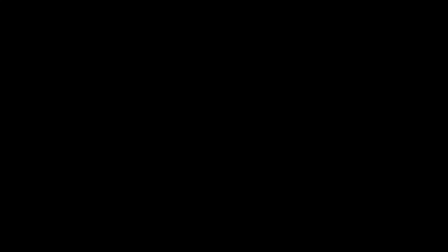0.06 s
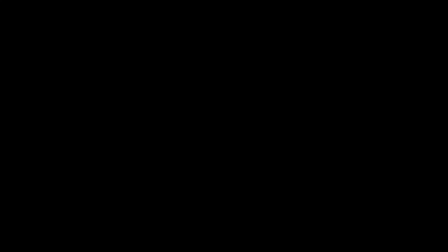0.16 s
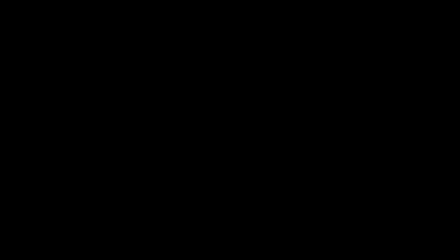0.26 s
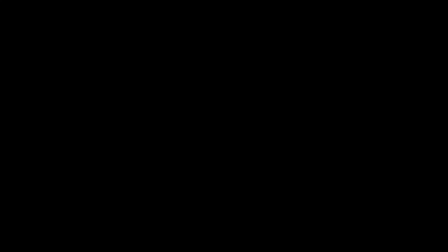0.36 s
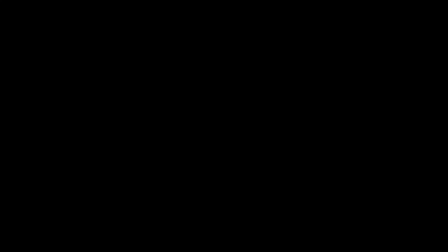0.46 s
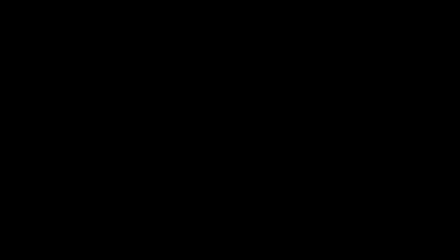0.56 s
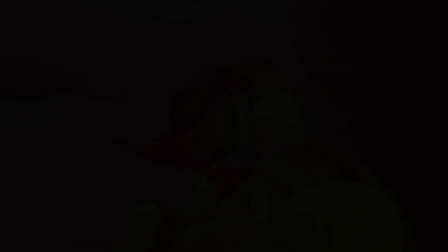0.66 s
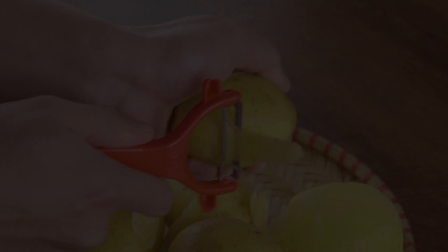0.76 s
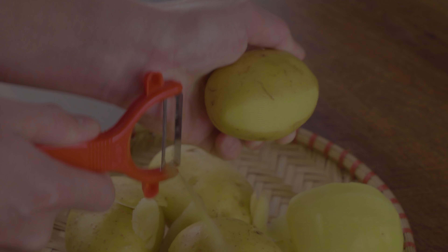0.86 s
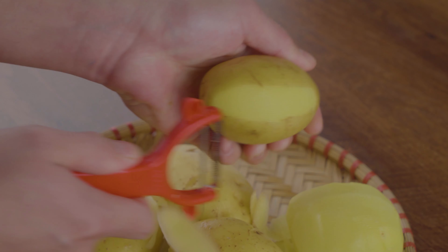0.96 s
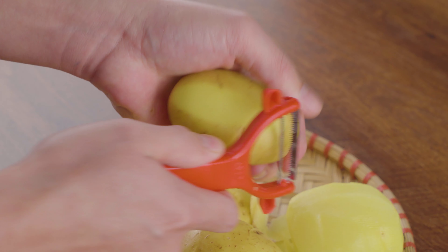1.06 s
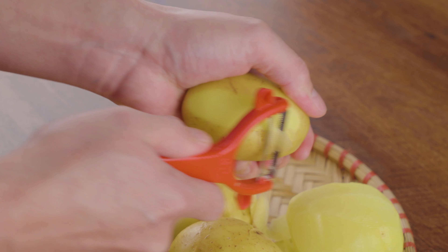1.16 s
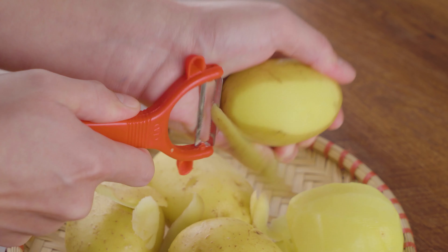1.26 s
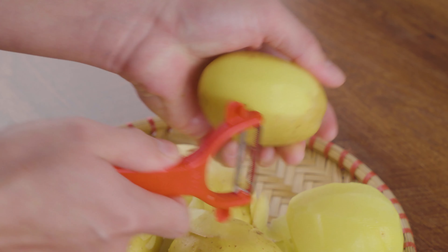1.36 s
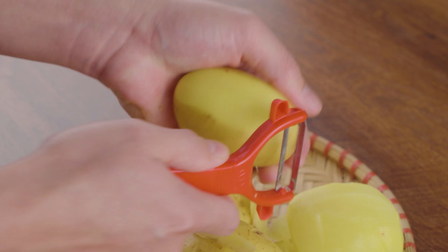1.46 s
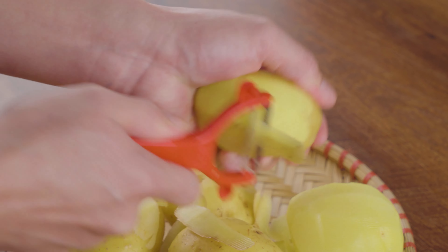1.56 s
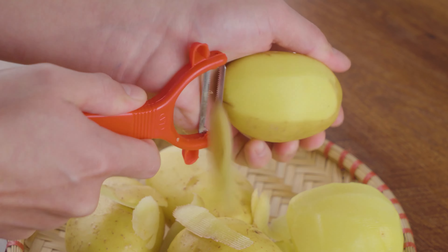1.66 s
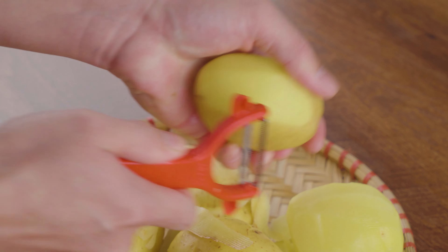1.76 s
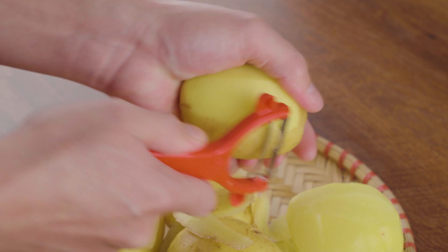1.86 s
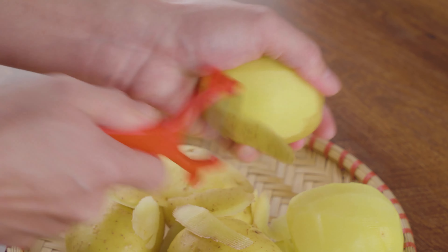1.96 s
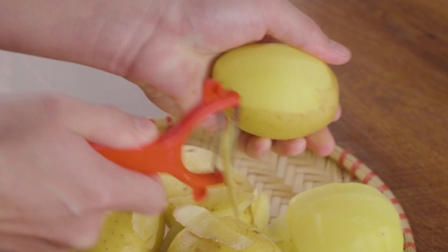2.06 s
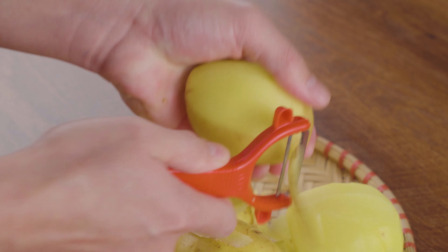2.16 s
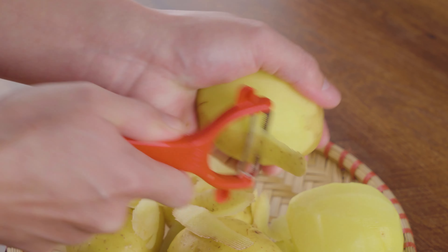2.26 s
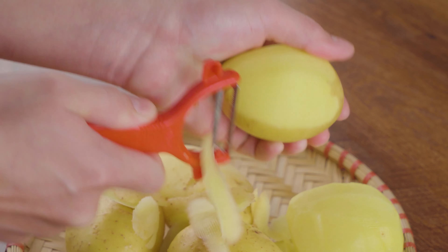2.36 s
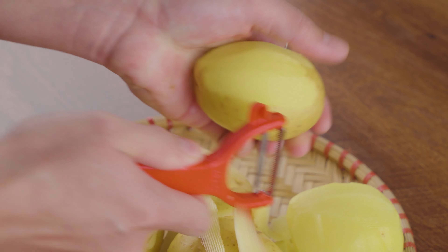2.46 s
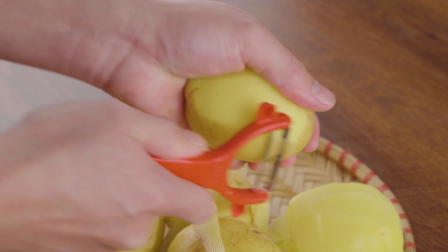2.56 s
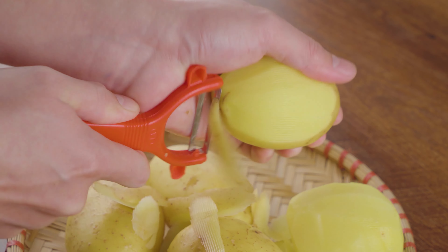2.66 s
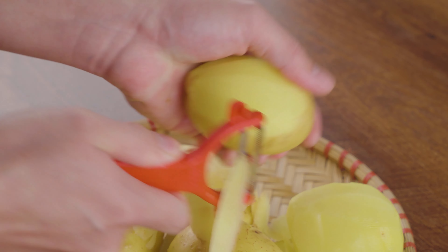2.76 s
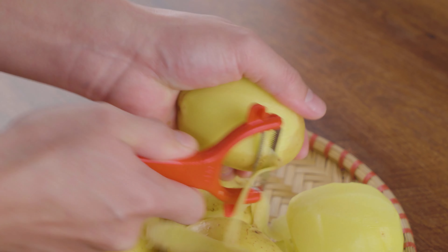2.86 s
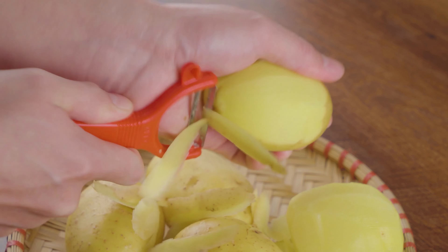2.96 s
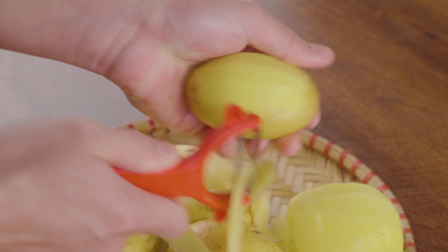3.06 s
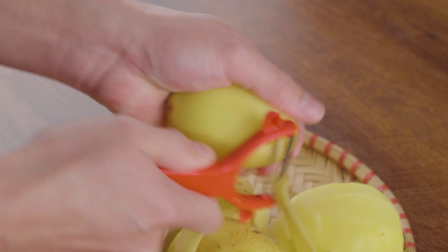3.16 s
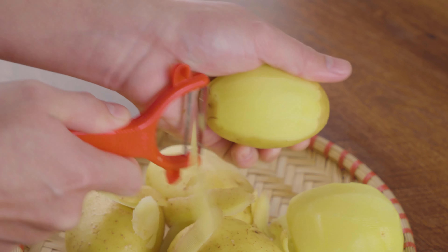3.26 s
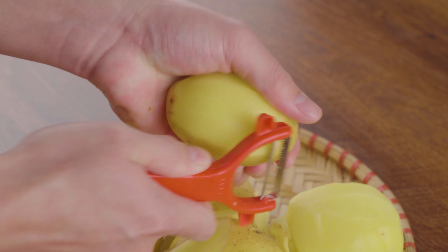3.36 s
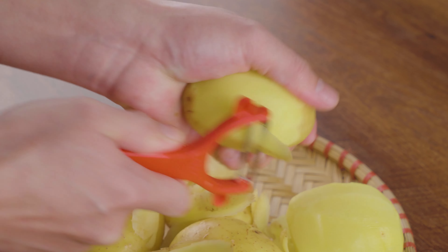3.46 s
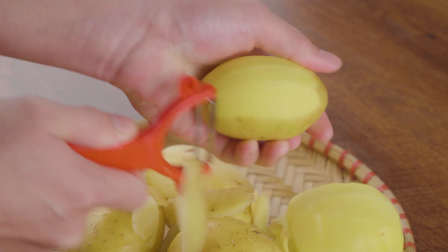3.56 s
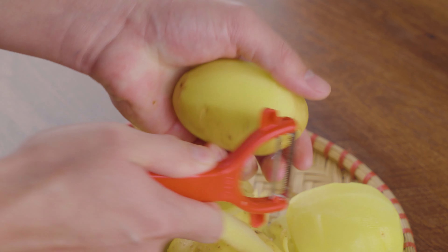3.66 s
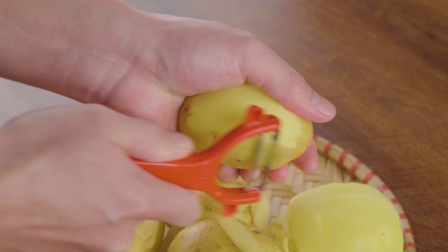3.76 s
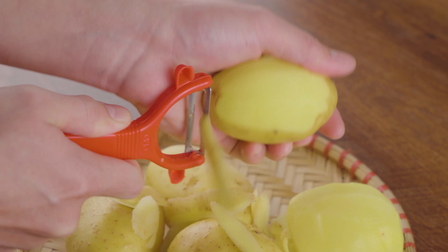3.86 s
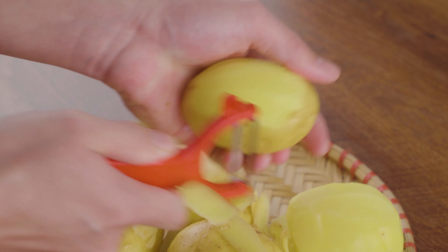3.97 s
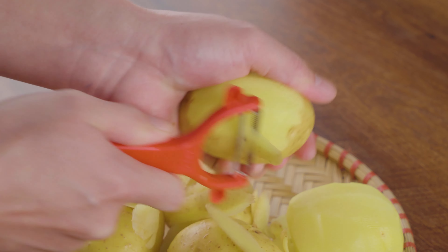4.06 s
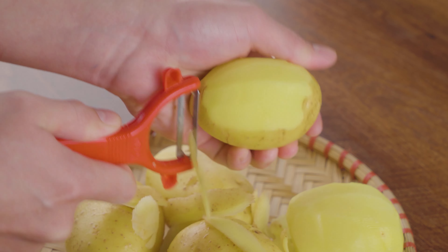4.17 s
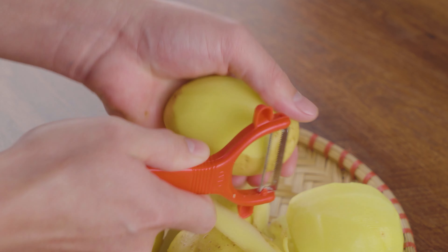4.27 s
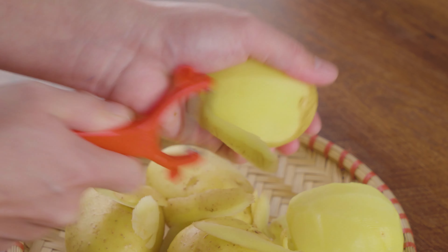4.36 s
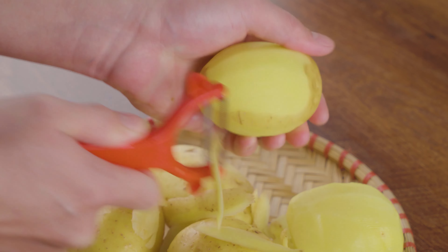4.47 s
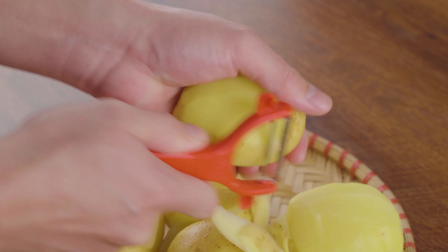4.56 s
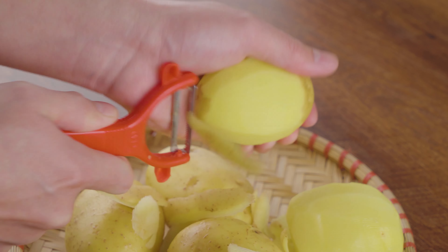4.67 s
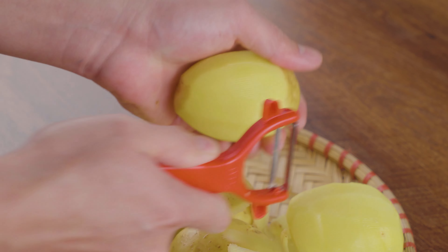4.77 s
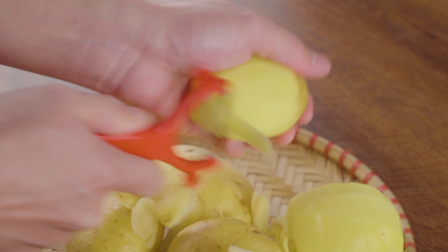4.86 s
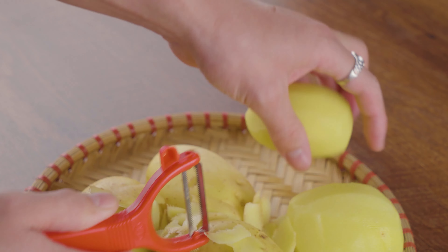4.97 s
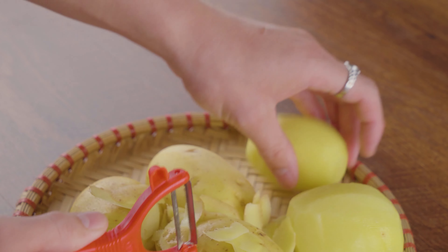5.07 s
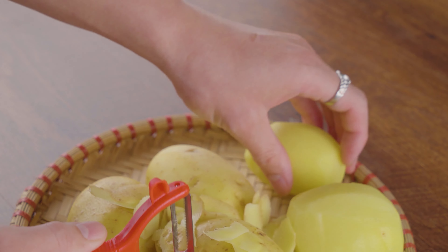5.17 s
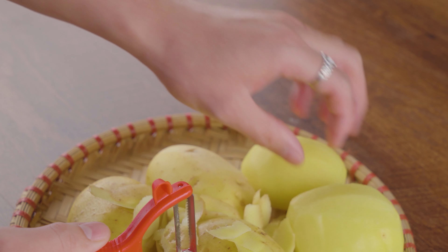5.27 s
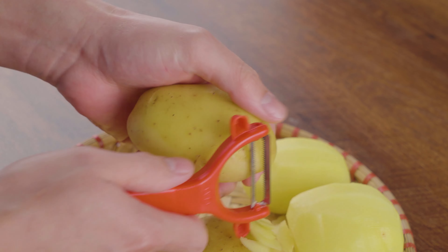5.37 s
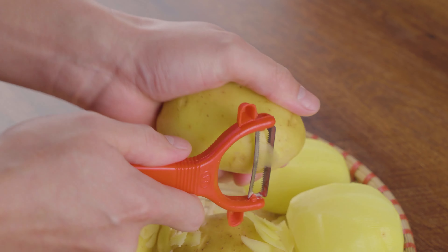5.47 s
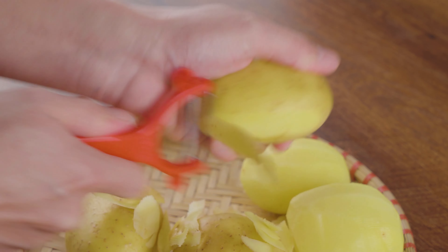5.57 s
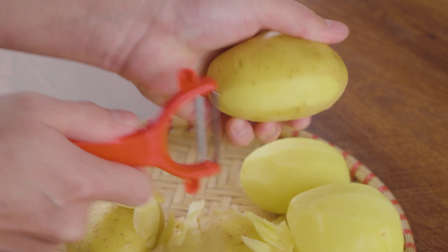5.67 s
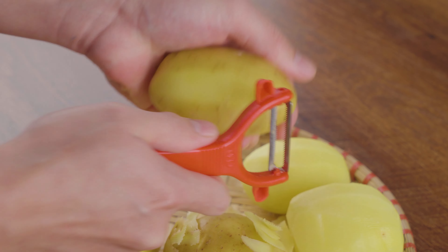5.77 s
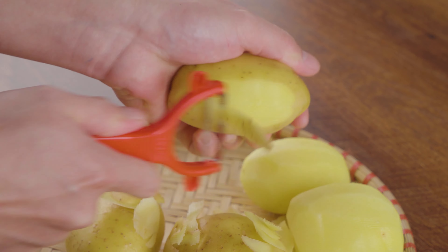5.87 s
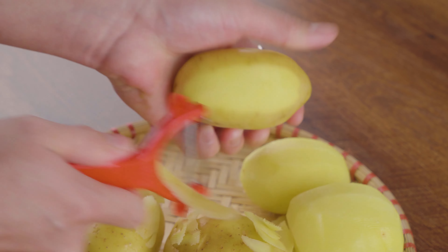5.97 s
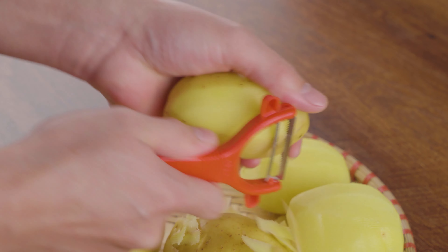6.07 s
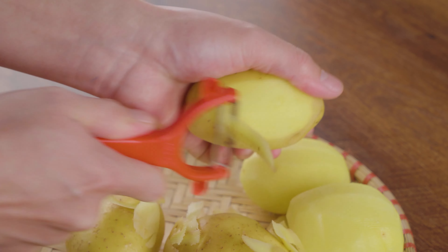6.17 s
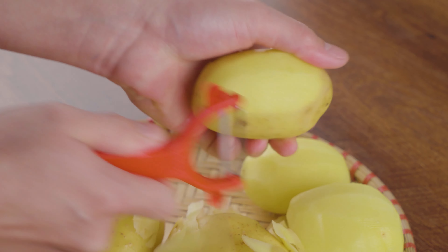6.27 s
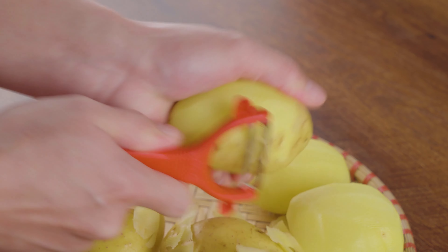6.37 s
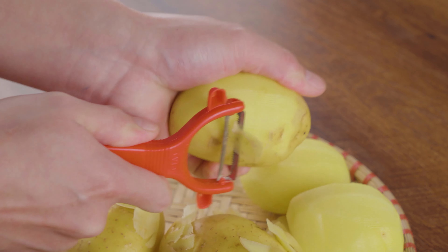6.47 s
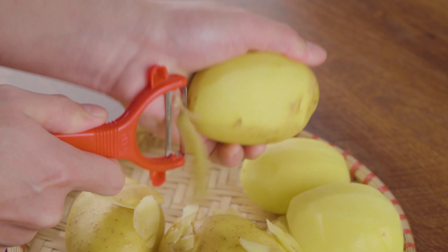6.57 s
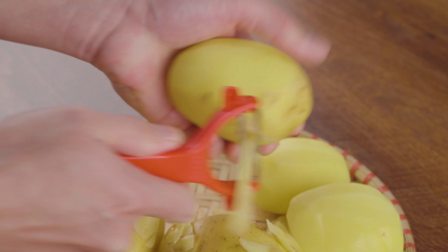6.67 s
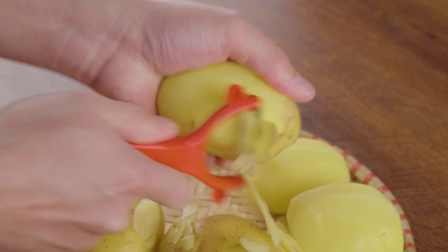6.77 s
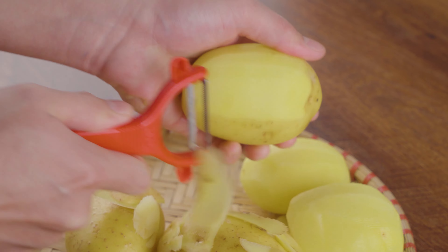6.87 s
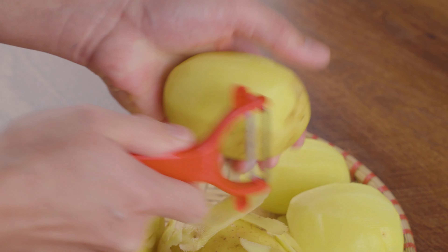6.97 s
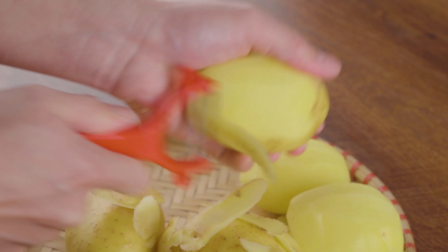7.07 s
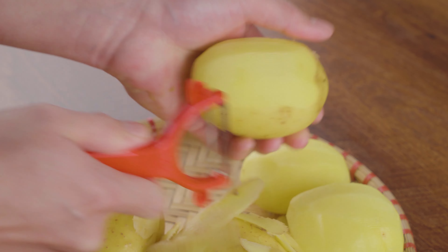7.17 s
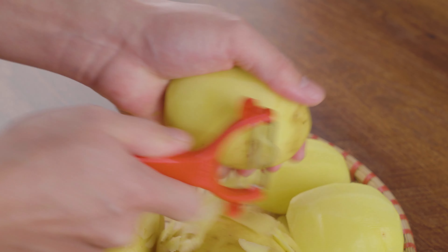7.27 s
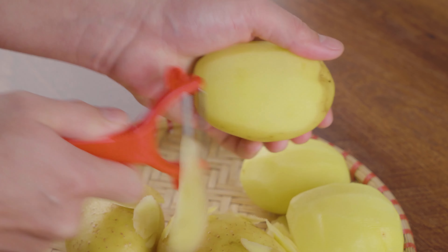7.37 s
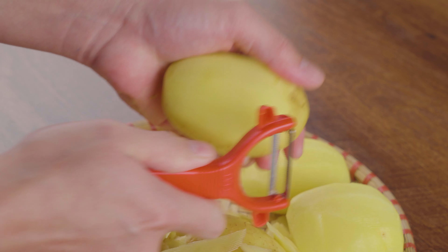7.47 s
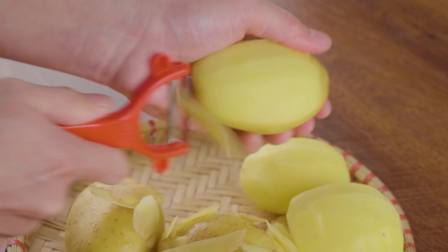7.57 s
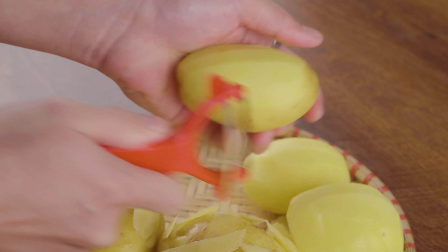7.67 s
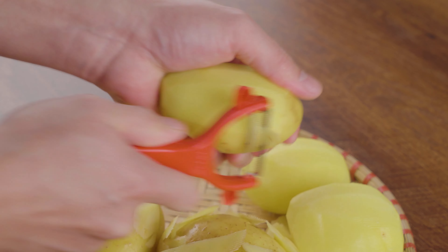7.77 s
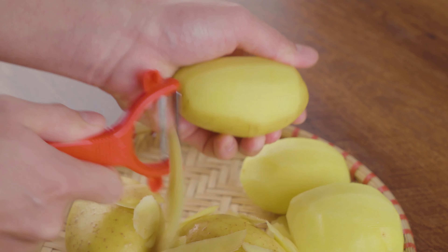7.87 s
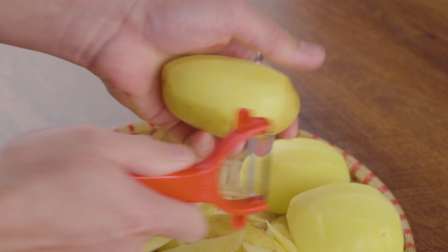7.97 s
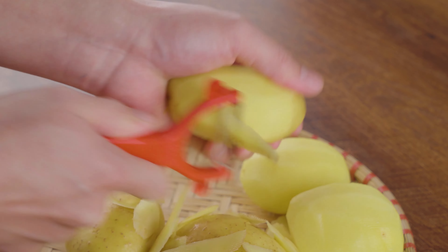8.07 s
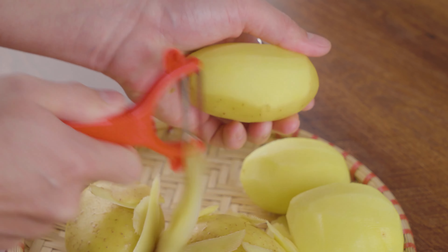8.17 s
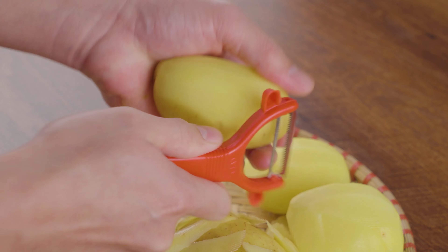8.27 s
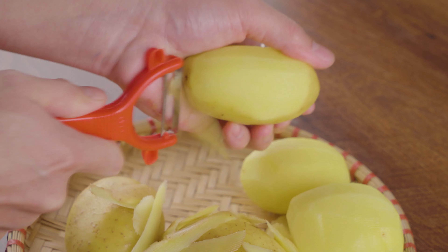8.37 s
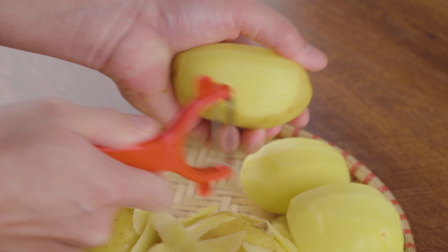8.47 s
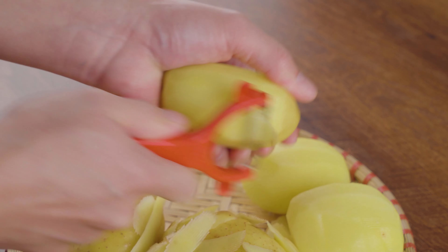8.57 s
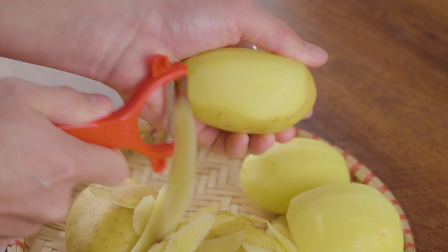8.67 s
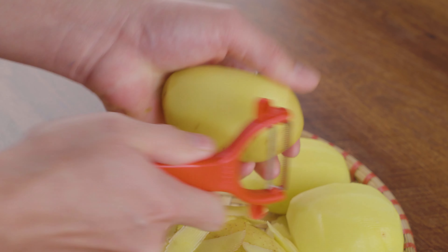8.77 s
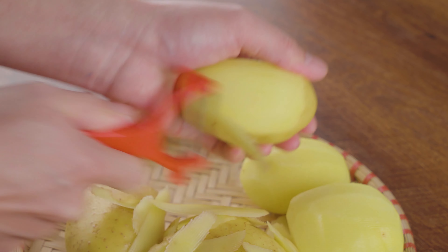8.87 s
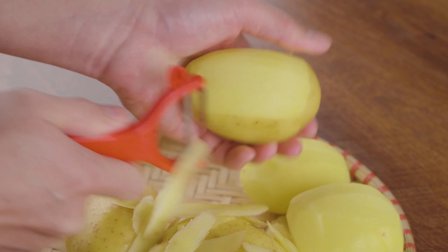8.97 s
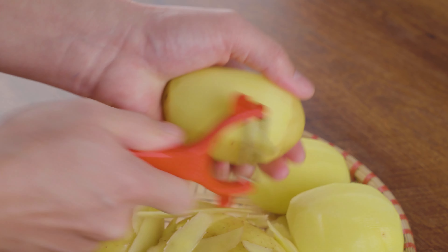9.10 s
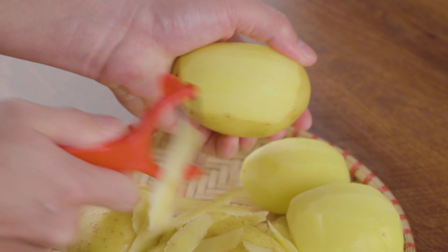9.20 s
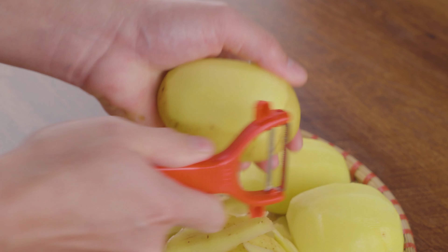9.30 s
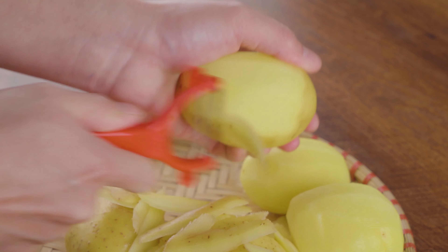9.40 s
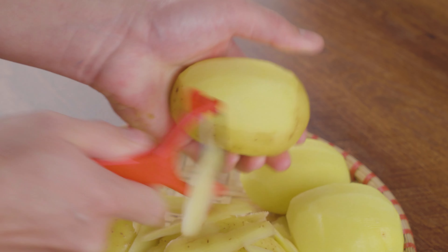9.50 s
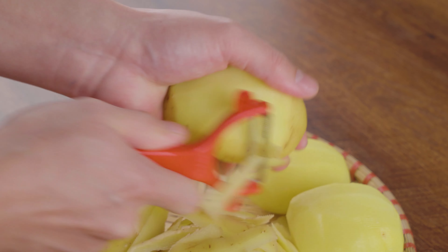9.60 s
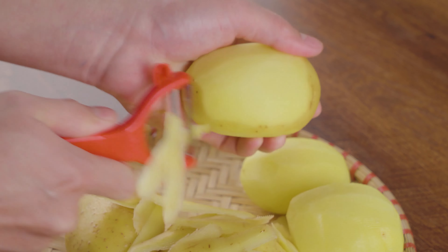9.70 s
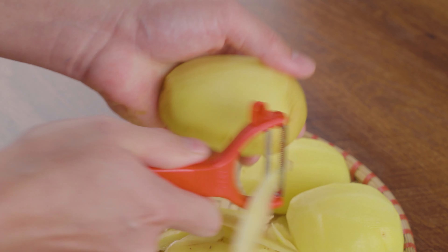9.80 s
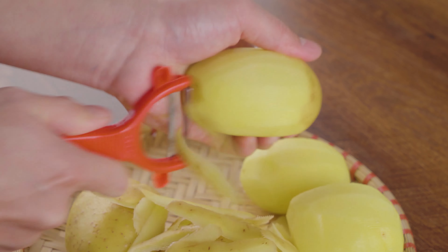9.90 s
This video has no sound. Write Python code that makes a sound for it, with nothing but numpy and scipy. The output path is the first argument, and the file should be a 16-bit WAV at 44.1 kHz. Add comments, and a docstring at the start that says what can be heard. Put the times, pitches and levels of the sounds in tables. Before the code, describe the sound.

After a near-silent instant, a faint low motor hum and room noise fade in at about 0.3 seconds, with a brief low rumble and a few light scrapes. From about 1.5 seconds a swivel peeler strips a raw potato in crisp, regular strokes, around three a second. Each stroke begins with a sharp tick of the loose metal blade and continues as a short, bright rasp with a slight crunch. At 5 seconds the peeling stops for half a second: the hum drops, a soft rumble returns, and fingers and peel rub faintly. The strokes resume at 5.5 seconds, with a small knock of the blade near 5.8. From about 7 seconds they settle at four a second, with slightly sharper clicks, and continue until the end at around 10 seconds. The sound is close, in a small, dry kitchen.

```python
"""A swivel peeler strips raw potatoes in a small, dry kitchen. After a moment of room noise and a
short silence, a motor hum and faint noise fade in and a low rumble swells. Quick strokes follow:
the loose blade lands with a tick, skids, bites and tears cells until it lifts off, exciting the
resonances of blade and tuber. Near 5 s the strokes stop and the background changes abruptly: hum
and whirr drop, rumble returns. Then the strokes resume and settle at about four a second."""
import sys
import numpy as np
from scipy import signal
from scipy.fft import rfft, irfft
from scipy.io import wavfile
from scipy.ndimage import uniform_filter1d

SR = 44100
rng = np.random.default_rng(int(sys.argv[2]) if len(sys.argv) > 2 else 0)


def digitize_waveform(pressure):
    """Quantize a signal to 16-bit integers and store it at the path in sys.argv[1].

    Rows of a 2-D input are taken as channels; values are limited to [-1, 1].
    """
    field = np.atleast_2d(pressure).T
    bounded = np.clip(field, -1, 1)
    quanta = np.round(bounded * 32767).astype(np.int16)
    wavfile.write(sys.argv[1], SR, quanta)


N = 438354

# Spectrum of the room noise: f/Hz, relative level/dB
ROOM_SPECTRUM = [(20, -20.5), (60, -12.5), (120, -10.5), (200, -19), (400, -20.5), (800, -24.5),
                 (1200, -25), (2200, -29.5), (3200, -37.5), (9000, -52.5), (13000, -60.5), (16000, -72.5)]
# Standing waves of the room: f/Hz, bandwidth/Hz, relative level/dB
ROOM_MODES = [(159, 8.3, -6), (162.5, 9, -3.5), (233, 19, -2), (291, 12, -4.5), (328, 30, -0.5),
              (433.5, 7.7, -4.5), (548, 14, -12)]
# Reverberation time: f/Hz, T60/s
ROOM_T60 = [(1000, 0.22), (3000, 0.13), (7000, 0.17), (11000, 0.094), (15000, 0.065)]
# Envelopes of the whirr near 1.5 kHz and of the thin hiss: t/s, level/dB
WHIRR_ENVELOPE = [(.26, -65), (.4, -70), (.73, -68), (.77, -74.5), (1.3, -77.5), (2.3, -74.5), (4, -78),
                  (4.96, -73.5), (4.99, -103), (5.4, -88), (5.43, -75.5), (5.7, -71.5), (7.5, -78.5),
                  (8.7, -75), (9.94, -75.5)]
HISS_ENVELOPE = [(.05, -100), (.26, -76), (.33, -89), (.75, -66), (.95, -82), (1.1, -83), (1.2, -93),
                 (4.96, -87.5), (4.99, -94), (5.4, -91), (9.94, -88.5)]
# Swells of rumble: f/Hz, then an envelope of t/s, level/dB
RUMBLE_SWELLS = [(44.2, [(.24, -99), (.275, -42), (.39, -46), (.47, -34.5), (.6, -44), (.76, -51),
                 (.93, -54), (1.05, -71), (1.4, -76), (1.5, -90)]), (60.5, [(4.97, -80), (4.99, -57),
                 (5.13, -50.5), (5.16, -43), (5.24, -55), (5.27, -51.5), (5.39, -50), (5.42, -71)]),
                 (29.7, [(7.48, -76), (7.56, -55), (7.62, -83)])]
# Peel and fingers brushing: t/s, decay time/s, level/dB
RUSTLES = [(1.874, 0.018, -75), (3.96, 0.13, -74), (5.153, .07, -72.5), (5.293, .05, -79), (7.48, .03, -78),
           (8.515, .03, -79), (8.746, 0.071, -84), (9.528, .07, -65)]
# Soft rubs and creaks, and one ringing knock as the blade lands at 5.84 s:
# t/s, two thirds of the duration/s, level/dB, f/Hz
RUBS_AND_KNOCK = [(0.361, 0.046, -62, 331), (0.364, .06, -58, 240), (.92, 0.15, -82, 8050),
                  (1.495, 0.11, -72.5, 453), (3.037, 0.14, -68, 178), (3.579, 0.086, -67.5, 226),
                  (3.68, 0.11, -67, 177), (4.988, 0.15, -73, 1110), (5.119, 0.049, -68, 428),
                  (5.17, 0.18, -75.5, 1070), (5.406, 0.058, -67.5, 560), (5.437, 0.063, -68.5, 331),
                  (5.774, .08, -68.5, 307), (5.836, 0.11, -57.5, 1520), (5.885, 0.11, -66, 504),
                  (5.928, 0.11, -68.5, 357), (8.1, .3, -69.5, 147.5), (8.6, .3, -71.5, 156),
                  (9.05, .3, -78, 169), (9.236, 0.033, -67, 616), (9.34, 0.066, -61, 152)]
# Modes of the flesh, and of the tuber in the cupped hand: f/Hz, bandwidth/Hz, gain per pass/dB
FLESH_MODES = [(1530, 475, -2.5), (1910, 140, -2), (2457, 710, -1.5)]
HOLLOW_MODES = [(643, 91, -3.5), (870, 290, -2.5), (1215, 310, 2)]
# Modes of blade and frame: f/Hz, bandwidth/Hz, gain/dB
BLADE_MODES = [(3303, 470, -8), (4430, 270, -34.5), (4940, 71, -15), (6300, 430, 4.5), (6856, 170, -1),
               (10820, 1300, 6.5), (11100, 6300, 0), (14600, 900, -15.5)]
# Broad spectrum of the cut: f/Hz, gain/dB
CUT_SPECTRUM = [(700, -27), (1500, -28.5), (2300, -22), (3200, -1.5), (5600, 1), (8000, -4), (10400, -11),
                (13300, -16), (15000, -1.5), (16500, -8.5)]
# The blade snapping on its pivots: t/s, peak level/dB, brightness/dB, relative knock/dB, ringing f/Hz
TICKS = [(0.273, -60.5, -30, -14, 6500), (0.3677, -59, -8, -6, 9900), (0.397, -65, -4, -6, 10500),
         (0.549, -47, -28, -22.5, 4710), (0.7387, -47, -9, -25, 8020), (1.5242, -15.5, -14.5, -40.5, 6230),
         (2.0296, -46.5, 0, -24, 6380), (2.2276, -20, -14.5, -45, 8740), (2.5692, -17.5, -9.5, -32.5, 6700),
         (2.8911, -16.5, -12.5, -33.5, 7030), (3.1898, -19.5, -16, -51.5, 4960),
         (3.2828, -19, -10.5, -45, 6240), (3.432, -35, -22.5, -40.5, 8740), (3.7643, -26.5, -21, -41, 8070),
         (4.059, -19, -32, -57, 6070), (4.33, -20, -13.5, -38, 6300), (4.4924, -46, -12, -22, 6250),
         (4.5977, -23.5, -15.5, -43, 6240), (4.8753, -17, -8.5, -31, 4640), (5.148, -56, -9, -20, 6140),
         (5.49, -43.5, -10, -38, 6360), (5.5043, -34, -15, -38, 7640), (5.8375, -17.5, -16.5, -26.5, 5130),
         (6.0065, -42, -11, -30, 6850), (6.122, -29, -29, -41, 7500), (6.3919, -21.5, -10, -29, 8770),
         (6.781, -11.5, -10.5, -34, 6590), (7.0524, -25.5, -17, -50, 6100),
         (7.2981, -16.5, -12.5, -44.5, 6240), (7.4583, -52, -32, -22, 7060), (7.5393, -9, -10, -31, 6710),
         (7.7925, -10.5, -10.5, -36.5, 8500), (8.0682, -11, -18, -37.5, 6430),
         (8.1564, -19.5, -12, -40, 6420), (8.336, -18.5, -9, -29.5, 4730), (8.431, -27, -22, -39, 6570),
         (8.5956, -23.5, -27, -44, 8540), (8.7545, -53, -20.5, -20, 7570), (8.857, -14.5, -11, -28.5, 6100),
         (9.1236, -21, -30, -27.5, 6900), (9.3797, -12.5, -11, -43, 8470), (9.629, -20, -6.5, -46, 6880),
         (9.872, -17, -38, -35.5, 8260)]
# Strokes: landing t/s, delay to bite/ms, delay to lift/ms; level/dB at skid, bite, mid-cut, lift;
# relative level/dB of hollow crunch, flesh crunch, initial rasp, main blade mode
STROKES = [(0.453, 92, 123.5, -65.5, -58, -64, -54, -30, -32, -19, -3),
           (0.611, 10, 85.1, -55, -42.5, -43, -47, -34, -27, -11.5, -8.5),
           (0.737, 12, 43.7, -58.5, -57, -61, -67, -23, -24, -32, -9),
           (0.827, 9.5, 59.3, -53, -44, -41.5, -39, -27.5, -23, -13.5, 2),
           (1.19, 12, 115.6, -58, -43, -42.5, -33, -30.5, -17, -8, -2.5),
           (1.524, 42, 141, -53, -42.5, -37, -34.5, -27, -22, -6, 0),
           (1.924, 11, 104.2, -49.5, -42.5, -41, -34, -33, -24, -3.5, 5.5),
           (2.228, 53, 138.6, -52.5, -39, -36.5, -30.5, -26, -22, -8.5, 2),
           (2.573, 39, 133.2, -51, -41.5, -36, -36.5, -30.5, -23.5, -8, 3),
           (2.894, 41, 104.7, -48, -40.5, -38, -28.5, -31.5, -22, -9, 1),
           (3.19, 39, 97.6, -53, -39, -34, -34.5, -33, -20, -7, 1),
           (3.43, 41, 130.1, -67, -47, -36, -32, -34, -22, -10.5, 1),
           (3.764, 28, 140.6, -60, -49.5, -38.5, -35, -30.5, -24.5, -9, 6.5),
           (4.059, 34, 121.5, -52.5, -40.5, -34.5, -38.5, -27, -24.5, -9, 1.5),
           (4.331, 26, 115.8, -56, -40.5, -38.5, -32.5, -37, -25.5, -7, 2),
           (4.598, 25, 109.8, -54.5, -41.5, -33, -37, -31.5, -23.5, -11.5, 0.5),
           (4.876, 25, 84.2, -42, -35.5, -36, -33.5, -29, -17.5, -6.5, -2),
           (5.488, 10, 39.94, -49.5, -42.5, -47, -47, -36, -21, -6.5, -2),
           (5.535, 19, 111, -54.5, -38.5, -35.5, -37, -40, -16, -11, -1),
           (5.836, 42, 126.5, -46.5, -34.5, -37.5, -41.5, -24.5, -18.5, -8, 5.5),
           (6.122, 19, 122.7, -53, -38.5, -34, -36.5, -32, -19, -5, 4.5),
           (6.391, 33, 73.5, -65, -38, -32.5, -33.5, -40, -30, -11, -2.5),
           (6.505, 15, 89.9, -52, -41.5, -41, -37.5, -30.5, -24, -14.5, -2),
           (6.782, 47, 99.8, -43, -31, -35, -36.5, -33.5, -19, -9, -5.5),
           (7.052, 21, 88.5, -56, -39, -30.5, -33.5, -26.5, -15.5, -11, 0),
           (7.296, 14, 89.8, -55, -45.5, -33.5, -35, -28, -18, -7, 0),
           (7.542, 25, 82.8, -39, -33, -33, -36, -29, -17.5, -6, 1),
           (7.793, 24, 114.9, -50, -36.5, -35.5, -39, -28, -23, -4.5, 2.5),
           (8.07, 27, 91.4, -41, -35, -34, -33, -37, -18.5, -9, 0),
           (8.337, 26, 98.6, -54.5, -35, -36, -40.5, -32, -19, -7, 0.5),
           (8.597, 16, 91.8, -51.5, -36.5, -33, -35.5, -41, -19.5, -9, 0),
           (8.859, 24, 99.2, -49.5, -39, -32.5, -34.5, -36, -19, -7.5, -2.5),
           (9.124, 22, 95.3, -48, -36.5, -35.5, -34.5, -38, -21.5, -6, 1.5),
           (9.379, 25, 103.1, -53, -37.5, -31.5, -37, -27.5, -19, -6, 1.5),
           (9.627, 22, 103.2, -53, -38, -33.5, -36.5, -29, -19.5, -7, 0.5),
           (9.875, 26, 97.3, -50, -35.5, -32.5, -26, -32, -15.5, -11.5, -0.5)]

FADE_IN_S, PAUSE_S = (0.256, 0.275), (4.985, 5.41)
HUM_HZ, HUM_SAG_HZ_PER_S, NOISE_RISE_DB_PER_S = 91.2, 0.22, 0.3671
REVERB_DB, REVERB_GAP_S = -8, 0.0008
STRIKE_SCATTER_DB, GRIP_SWELL_DB = 4.7, 2
BRUSH_S, LAND_S, BITE_S, LIFT_S = 0.024, 0.002, 0.006, 0.004
BRUSH_DB, RASP_AT_LIFT_DB, UPPER_MODE_DB = -12, -9, -5
FIZZ_DB, FIRM_DB, FIZZ_DB_PER_DB = -4.5, -40, 0.1  # cuts lighter than FIRM_DB fizz less
CRUNCH_PEAK_DEPTH = 0.85  # depth of the cut runs from 0 to 1


def undb(db):
    """Amplitude ratio of a level in decibels."""
    return np.exp(np.asarray(db) * (np.log(10) / 20))


def unit(x):
    """Normalisation to rms 1."""
    return x / np.sqrt(np.mean(x ** 2))


def noise(count=N):
    """Gaussian white noise."""
    return rng.standard_normal(count)


def curve(times, values):
    """Linear interpolation between timed values."""
    return np.interp(np.arange(N) / SR, times, values)


def in_pause(usual_db, pause_db):
    """A level that steps to another value during the pause."""
    start, end = PAUSE_S
    return curve([start - .01, start + .01, end - .01, end + .01], [usual_db, pause_db, pause_db, usual_db])


def flicker(rate_hz):
    """Random modulation: held values, smoothed, with a spread near 1."""
    step = 16
    hold = max(int(SR / rate_hz / step), 1)
    held = np.repeat(noise(N // step // hold + 2), hold)
    smooth = uniform_filter1d(uniform_filter1d(held, hold), hold)
    return 1.3 * uniform_filter1d(np.repeat(smooth, step)[:N], step)


def band(x, lo_hz, hi_hz):
    """Band-pass filtering, normalised to rms 1."""
    return unit(signal.sosfilt(signal.butter(3, (lo_hz, hi_hz), "bandpass", fs=SR, output="sos"), x))


def highpass(x, hz):
    """Third-order high-pass filtering."""
    return signal.sosfilt(signal.butter(3, hz, "highpass", fs=SR, output="sos"), x)


def ring(x, hz, width):
    """A damped resonator with gain 1 at its centre."""
    return signal.lfilter(*signal.iirpeak(hz, hz / width, fs=SR), x)


def modes(x, table):
    """Modal superposition: resonances summed with alternating sign."""
    return sum((-1) ** k * undb(db) * ring(x, hz, width) for k, (hz, width, db) in enumerate(table))


def colour(x, spectrum):
    """Minimum-phase filtering to a given spectrum, by folding the cepstrum."""
    hz, db = np.transpose(spectrum)
    size = 8192
    grid_hz = np.maximum(np.arange(size // 2 + 1) * SR / size, 1)
    cepstrum = irfft(np.interp(np.log(grid_hz), np.log(hz), db) * np.log(10) / 20)
    cepstrum[1:size // 2] *= 2
    cepstrum[size // 2 + 1:] = 0
    return signal.fftconvolve(x, irfft(np.exp(rfft(cepstrum))))[:len(x)]


def crackle(rate_hz, scatter_db):
    """Shot noise, as of bursting cells: dense impulses of uneven size at random times."""
    count = int(rate_hz * N / SR)
    sizes = noise(count) * undb(scatter_db * np.minimum(rng.exponential(size=count), 3.5))
    return unit(np.bincount(rng.integers(0, N, count), sizes, N))


def room_noise():
    """Broadband noise and randomly excited standing waves, with a whirr and a thin hiss."""
    room_db = in_pause(-73.5, -73) + NOISE_RISE_DB_PER_S * np.arange(N) / SR
    broad = unit(colour(noise(), ROOM_SPECTRUM))
    standing = unit(sum(undb(db + 3.1 * flicker(5.1)) * ring(noise(), hz, width) / np.sqrt(width)
                        for hz, width, db in ROOM_MODES))
    core, skirt = band(noise(), 1400, 1800), band(noise(), 1000, 2500)
    whirr = core * undb(2.7 * flicker(25)) + undb(-7) * skirt
    hiss = unit(ring(ring(noise(), 7000, 3500), 7000, 4500))
    return (undb(room_db + flicker(3.4)) * (broad + undb(-5) * standing)
            + undb(curve(*np.transpose(WHIRR_ENVELOPE))) * whirr
            + undb(curve(*np.transpose(HISS_ENVELOPE))) * hiss)


def rumble():
    """Random frequency modulation: a low tone wanders above a deeper band of noise."""
    out = np.zeros(N)
    for hz, envelope in RUMBLE_SWELLS:
        times, db = np.transpose(envelope)
        gate = curve([times[0] - .03, times[0], times[-1], times[-1] + .034], [0, 1, 1, 0])
        tone = np.sqrt(2) * np.sin(2 * np.pi * np.cumsum(hz * (1 + .1 * flicker(11))) / SR)
        deep = unit(ring(ring(noise(), .83 * hz, 27), .83 * hz, 27))
        out += gate * undb(curve(times, db)) * (.95 * tone + .33 * deep)
    return out


def motor_hum():
    """Quasi-periodic vibration: a sagging tone, faint lines at 4/3, 5/3 and 2 times it, a noise skirt."""
    hz = HUM_HZ - HUM_SAG_HZ_PER_S * np.arange(N) / SR
    phase = 2 * np.pi * np.cumsum(hz + .8 * flicker(8.8)) / SR
    lines = sum(undb(db + 1.1 * flicker(2.1)) * np.sin(order * phase / 3)
                for order, db in ((4, -24.5), (5, -23), (6, -30)))
    tone = np.sqrt(2) * (np.sin(phase) + lines) * undb(2 * flicker(7.9))
    skirt = undb(-10.5) * band(noise(), 68, 96.8)
    return undb(in_pause(-52.5, -59)) * (tone + skirt)


def reverberation(x):
    """The kitchen's diffuse field decays exponentially, fastest in the top bands."""
    t = np.arange(SR // 3) / SR
    hz, t60 = np.transpose(ROOM_T60)
    tail = sum(ring(noise(len(t)), f, f / 2) * undb(-60 * t / np.interp(np.log(f), np.log(hz), t60))
               for f in 500 * 2 ** np.arange(0, 5.1, .5))
    tail *= t > REVERB_GAP_S
    return undb(REVERB_DB) * signal.fftconvolve(x, tail / np.sqrt(np.sum(tail ** 2)))[:N]


def rustles():
    """Friction of peel and fingers: bright bursts, quick to rise, slow to fade, and a bed in the pause."""
    db = np.full(N, -150.)
    for s, decay_s, peak_db in RUSTLES:
        times = [s - .01, s - .009, s, s + decay_s, s + decay_s + .001]
        db = np.maximum(db, curve(times, [-150, peak_db - 15, peak_db, peak_db - 9.5, -150]))
    steady = undb(in_pause(-150, -87.5) + 1.3 * flicker(20)) * band(noise(), 2600, 7000)
    return undb(db) * unit(colour(crackle(8000, 1.8), CUT_SPECTRUM)) + steady


def rubs_and_knock():
    """Noise-driven resonance: soft narrow-band rubs and creaks, and one ringing knock of the landing blade."""
    out = np.zeros(N)
    for s, length, db, hz in RUBS_AND_KNOCK:
        start, count = int(s * SR), int(length * SR * 1.5)
        burst = unit(ring(ring(noise(SR // 2), hz, hz / 7), hz, hz / 4))[-count:]
        out[start:start + count] += undb(db) * burst * np.sin(np.pi * np.sqrt(np.arange(count) / count))
    return out


def blade_ticks():
    """Impact excitation: each snap on the pivots rings the blade's modes and knocks the tuber."""
    t = np.arange(4096) / SR
    out = np.zeros(N + len(t))
    for s, db, bright_db, knock_db, ring_hz in TICKS:
        push = noise(len(t)) * (t / .00062) ** 2 * np.exp(-t / .00064)
        chatter = noise(len(t)) * undb(-16) * np.exp(-t / .0044)
        struck = []
        for hz, width, gain_db in BLADE_MODES:
            octaves_off = min(abs(np.log2(hz / ring_hz)), .6)
            struck.append((hz, width, rng.normal(gain_db, STRIKE_SCATTER_DB) - 4.9 * octaves_off))
        tick = colour(push + chatter, CUT_SPECTRUM) + undb(1.5) * modes(push + chatter, struck)
        tick += undb(7.5) * ring(tick, ring_hz, width=98)  # one narrow resonance lingers
        tick = highpass(tick, 1800)
        tick += (undb(bright_db + 13) - 1) * highpass(tick, 8500)
        thud = noise(len(t)) * np.exp(-t / .032)
        knock = modes(modes(thud, FLESH_MODES[:1]), FLESH_MODES[:1])
        snap = tick / np.abs(tick).max() + undb(knock_db) * knock / np.abs(knock).max()
        start = int(s * SR)
        out[start:start + len(t)] += undb(db) * snap
    return out[:N]


def tuber(x, table):
    """Forced resonance of the tuber: two passes through each mode, which swells as the grip shifts."""
    return unit(sum((-1) ** k * undb(2 * db + GRIP_SWELL_DB * flicker(7))
                    * ring(ring(x, hz, width), hz, width) for k, (hz, width, db) in enumerate(table)))


def blade_edge(cut_db, depth, rasp_db, main_mode_db):
    """Forced vibration: tearing cells drive each blade mode, favouring high ones as the cut deepens."""
    tilt_db_per_octave = 4 * (depth - .6)
    extra_db = {3: main_mode_db, 5: UPPER_MODE_DB}  # by mode index
    singing = np.zeros(N)
    for k, (hz, width, db) in enumerate(BLADE_MODES):
        mode_db = db + 3.7 * flicker(60) + 2 * flicker(9) + tilt_db_per_octave * np.log2(hz / 4500)
        singing += undb(mode_db + extra_db.get(k, 0)) * ring(crackle(6000, 1.4), hz, width)
    edge = colour(crackle(12000, 1.1), CUT_SPECTRUM) + undb(6.5) * singing
    rasp = undb(rasp_db)
    fizz = undb(FIZZ_DB + FIZZ_DB_PER_DB * np.clip(cut_db - FIRM_DB, -30, 0))
    hiss = np.sqrt(np.clip(1 - rasp ** 2 - fizz ** 2, .05, 1))
    edge = (rasp * band(band(edge, 2800, 4400), 2500, 6000)
            + hiss * band(edge, 4400, 8500)
            + fizz * band(edge, 8500, 17000))
    # the hand sets the power of the cut; the modes only trade their shares of it
    return edge / np.sqrt(uniform_filter1d(edge ** 2, size=SR // 50) + 1e-6)


def stroke_envelopes():
    """Piecewise-linear envelopes: the blade brushes the skin, lands, skids, bites and lifts."""
    rows = []
    for land, bite_ms, lift_ms, skid, start, middle, end, hollow, crunch, rasp, main_mode in STROKES:
        bite, lift = land + bite_ms / 1000, land + lift_ms / 1000
        stages = [(land - BRUSH_S - .001, -150, 0), (land - BRUSH_S, -84, 0),  # t/s, level/dB, depth
                  (land - LAND_S, skid + BRUSH_DB, 0), (land + BITE_S, skid, 0), (bite - .002, skid, 0),
                  (bite + BITE_S, start, .1), ((bite + lift) / 2, middle, .6), (lift - LIFT_S, end, 1),
                  (lift + LIFT_S, -80, 1), (lift + LIFT_S + .001, -150, 1)]
        rows += [(s, db, depth, hollow, crunch, rasp + depth * (RASP_AT_LIFT_DB - rasp), main_mode)
                 for s, db, depth in stages]
    times, *columns = np.transpose(sorted(rows))
    return [curve(times, column) for column in columns]


def cutting():
    """Stick-slip friction: fluttering pressure scales the blade's rasp and the tuber's crunch."""
    cut_db, depth, hollow_db, crunch_db, rasp_db, main_mode_db = stroke_envelopes()
    pressure = undb(cut_db + .6 * flicker(60) + flicker(300))
    edge = blade_edge(cut_db, depth, rasp_db, main_mode_db)
    hollow = undb(hollow_db) * tuber(crackle(2000, .67), HOLLOW_MODES)
    crunch = undb(crunch_db) * tuber(crackle(3000, .53), FLESH_MODES)
    tuber_gain = undb(2.5 - 14 * np.abs(depth - CRUNCH_PEAK_DEPTH) + 2 * flicker(40))
    return pressure * (edge + (hollow + crunch) * tuber_gain)


def scene():
    """Superposition of the peeler's direct sound, its reverberation and the background, in mono."""
    direct = cutting() + blade_ticks()
    # the tail of the stroke before the pause stops short
    tail = reverberation(direct) * undb(curve([4.98, 4.99, 5.1, 5.11], [-1.5, -7, -34, -1.5]))
    room = room_noise()
    mix = direct + tail + rubs_and_knock() + rustles() + motor_hum() + rumble() + room
    opening_noise = undb(-2.5) * room * curve([.033, .0407], [1, 0])
    return (opening_noise + curve(FADE_IN_S, [0, 1]) ** 2 * mix)[None]


def record(dry):
    """Band limiting: a steep elliptic low-pass at 15.8 kHz."""
    return signal.sosfilt(signal.ellip(10, .2, 80, 15800, fs=SR, output="sos"), dry)


dry = scene()
out = record(dry)
digitize_waveform(out)
```